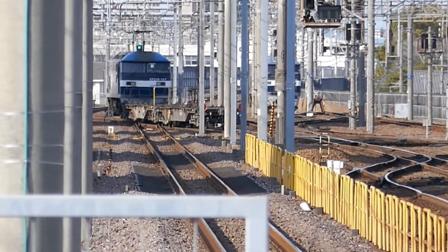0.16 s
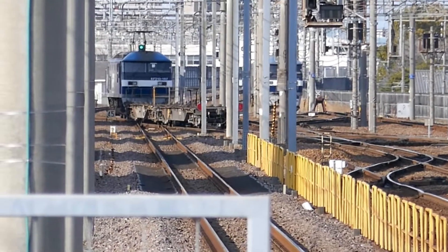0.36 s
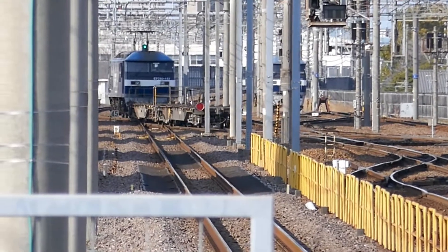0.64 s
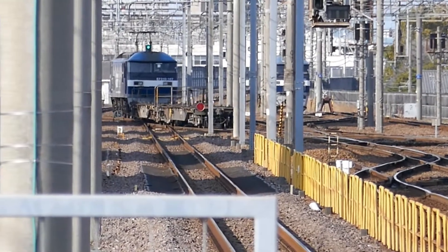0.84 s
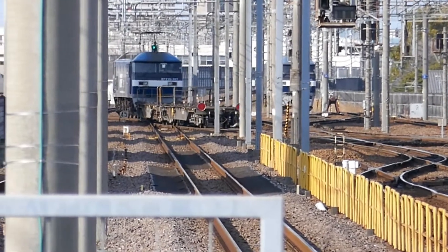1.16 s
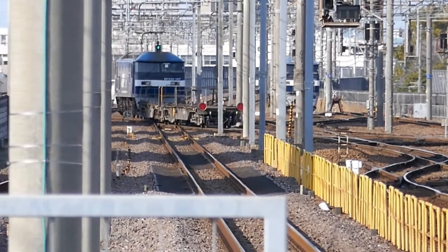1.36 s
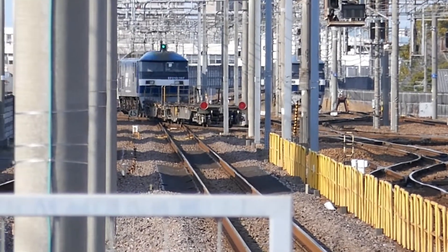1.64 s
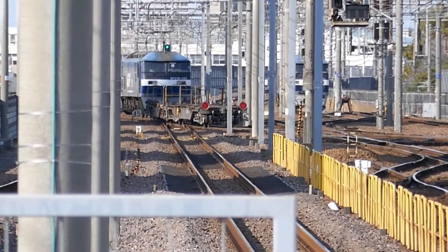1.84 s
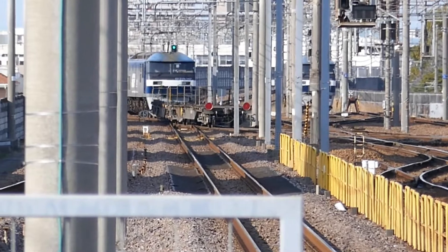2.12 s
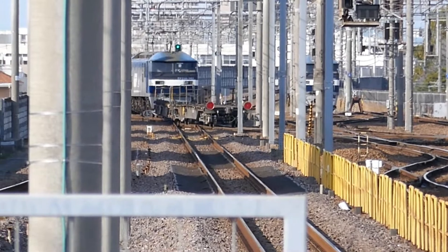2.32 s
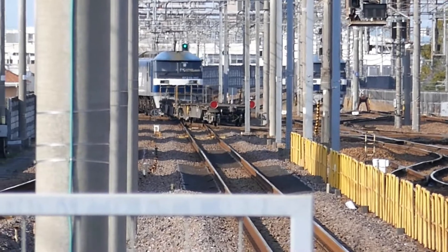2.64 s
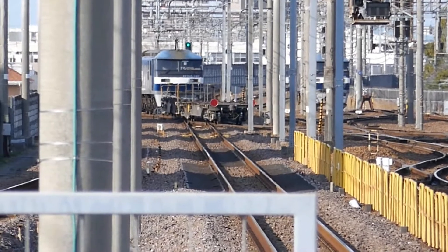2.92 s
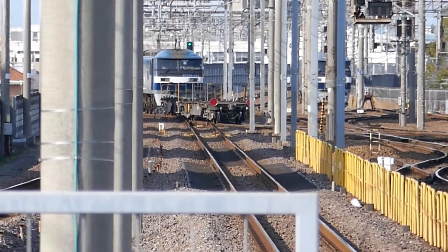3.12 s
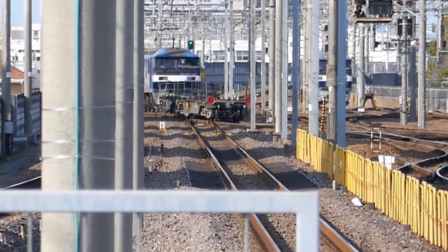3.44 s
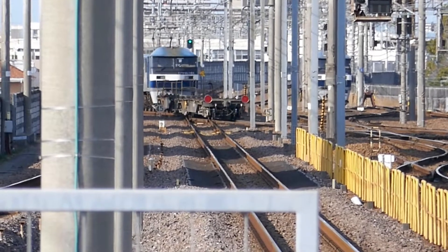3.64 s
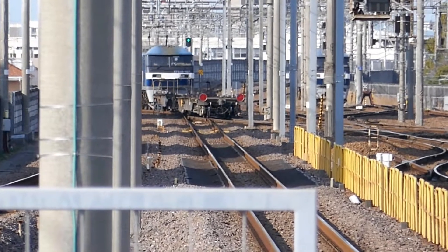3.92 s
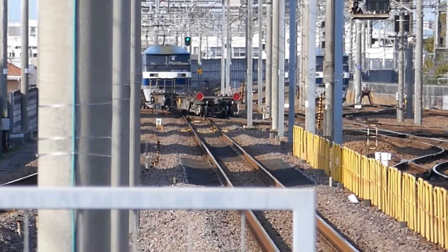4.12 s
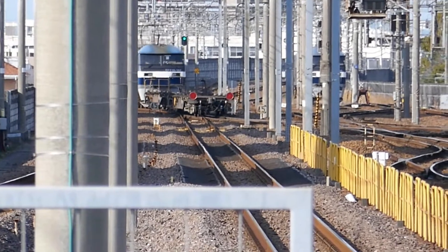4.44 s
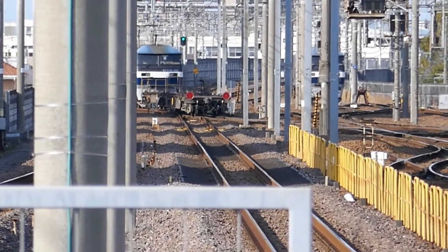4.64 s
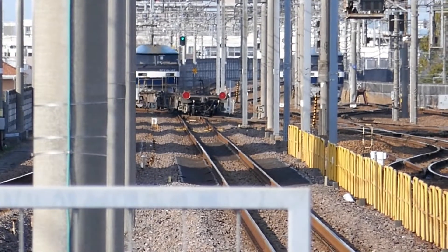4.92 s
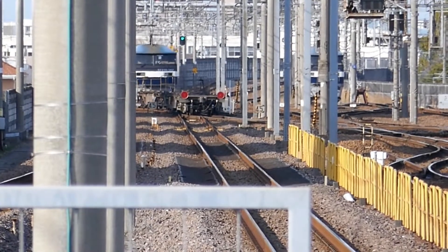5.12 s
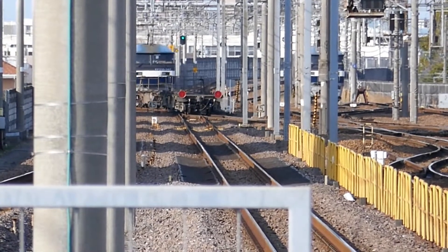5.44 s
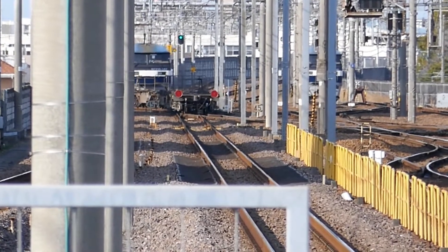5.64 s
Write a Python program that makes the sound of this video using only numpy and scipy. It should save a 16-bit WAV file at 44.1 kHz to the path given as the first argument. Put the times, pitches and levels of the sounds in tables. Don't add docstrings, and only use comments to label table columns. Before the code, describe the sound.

A slow electric freight train in an open rail yard, heard from a platform end through a small stereo camera microphone with soft hiss. It starts fairly quiet: rough wheel roar, mostly low-middle, slightly left, with a motor hum near 100 Hz and its overtones. From 0.5 to 2 s the hum glides up about a third of its pitch, fluttering in short uneven swells, while the roar grows; the deep hum is strongest around 2 s. It sinks back by 3 s, then hovers with smaller swells near 3.5 s and fades. A faint fan winds up beneath, clearest at 2.3-2.8 s, gone by 3.6 s. Faint bright flange brushes pass at 1.5, 2.1, 3.3 and 3.9 s. From 4.35 s bass deepens, the image centres, and dull joint thumps cluster to 4.9 s, then around 5.4 s. A muted knock falls at 4.9 s, a tiny stone tick at 5.1 s. The roar continues to the end, about 5.8 s.

```python
import sys
import numpy as np
from scipy import signal
from scipy.fft import rfft, irfft, next_fast_len
from scipy.io import wavfile
from scipy.ndimage import uniform_filter1d

SR = 44100
rng = np.random.default_rng(int(sys.argv[2]) if len(sys.argv) > 2 else 0)


def decibels_to_gain(level_db):
    exponent = np.asarray(level_db, float) / 20
    return 10 ** exponent


def store_pcm(level_fs):
    pcm = np.round(np.clip(level_fs, -1, 1) * 32767).astype(np.int16)
    wavfile.write(sys.argv[1], SR, np.atleast_2d(pcm).T)


N = 254456
M = next_fast_len(N)
TIME_S = np.arange(N) / SR
LEFT_RIGHT = np.array([[1], [-1]])


def columns(table):
    s, *values = np.transpose(table)
    return [np.interp(TIME_S, s, v) for v in values]


def at(table, hz):
    table_hz, table_db = np.transpose(table)
    return np.interp(np.log(hz), np.log(table_hz), table_db)


def walk(rate_hz):
    hold = int(SR / rate_hz)
    steps = np.repeat(rng.standard_normal(N // hold + 1), hold)
    return 1.323 * uniform_filter1d(uniform_filter1d(steps, hold), hold)[:N]


def ramp(start_s, length_s):
    return np.clip((TIME_S - start_s) / length_s, 0, 1)


def place(x, pan_db):
    return x * decibels_to_gain(np.array([pan_db * np.ones(N), -pan_db * np.ones(N)]) / 2)


def swells(table, floor_db):
    edge_s = 0.06
    gain = decibels_to_gain(floor_db)
    for start_s, length_s, db in table:
        rise = ramp(start_s - edge_s / 4, edge_s)
        fall = 1 - ramp(start_s + length_s - edge_s / 2, edge_s)
        gain = gain + decibels_to_gain(db) * rise * fall
    return 20 * np.log10(gain)


def orders(hz, numbers, levels_db, wobble_hz, rough, lag_rad):
    turns = np.cumsum(hz + wobble_hz * walk(12)) / SR
    out = 0
    for k, db in zip(numbers, levels_db):
        size = np.sqrt(2) * decibels_to_gain(db) * (1 + rough * k * walk(30))
        out = out + size * np.sin(2 * np.pi * k * turns + lag_rad * LEFT_RIGHT)
    return out


def shudder(hz, db, width_hz):
    phase = 2 * np.pi * np.cumsum(hz) / SR
    return decibels_to_gain(db) * (walk(width_hz) * np.sin(phase) + walk(width_hz) * np.cos(phase))


# time in seconds, rotation order in Hz.
MOTOR_SPEED = [(0, 98.2), (.6, 104.8), (.8, 108.5), (1.0, 112), (1.5, 124), (1.8, 131.8), (2.0, 131.8),
               (2.2, 127), (2.5, 114.5), (2.66, 101.5), (3.0, 98.2), (3.2, 95.5), (3.65, 101.8),
               (4.0, 103.4), (4.19, 102), (4.41, 107.8), (5.1, 99.8), (5.77, 100.3)]
# start in seconds, length in seconds, level in dB.
ORDER_1_SWELLS = [(0, 0.123, -49), (.36, 0.16, -44.5), (.6, 0.13, -44), (0.784, 0.29, -39),
                  (1.08, 0.23, -37), (1.302, 0.22, -40.5), (1.502, 0.34, -32.5), (1.862, 0.15, -26),
                  (2.053, 0.11, -25), (2.14, 0.18, -25), (3.6, 0.3, -40.5), (4.074, 0.44, -40),
                  (5.0, 0.46, -42)]
# start in seconds, length in seconds, level in dB.
ORDER_2_SWELLS = [(.37, .2, -35), (.6, 0.14, -28.5), (.76, 0.18, -24), (1.03, 0.23, -27), (1.33, .14, -23),
                  (1.53, 0.18, -24.5), (1.7, .17, -20), (1.97, 0.14, -23), (2.26, .18, -32),
                  (2.751, 0.523, -26.5), (3.29, 0.18, -32), (3.47, 0.15, -21.5), (3.63, .16, -21.5),
                  (3.83, .17, -28), (4.06, 0.19, -36), (4.3, 0.14, -26.5), (4.95, 0.13, -34)]
# start in seconds, length in seconds, level in dB.
ORDER_3_SWELLS = [(.62, 0.24, -34.5), (1.0, 0.31, -34.5), (1.42, 0.095, -34.5), (1.63, 0.11, -28),
                  (1.87, 0.22, -35.5), (3.6, 0.45, -40.5), (4.38, .2, -31.5)]


def motor():
    hz, = columns(MOTOR_SPEED)
    levels_db = [swells(ORDER_1_SWELLS, -55.5), swells(ORDER_2_SWELLS, -44.5), swells(ORDER_3_SWELLS, -51)]
    hum = orders(hz, (1, 2, 3), levels_db, wobble_hz=0.85, rough=0.12, lag_rad=0.16)
    load_db = 10 * np.log10(uniform_filter1d(decibels_to_gain(levels_db[1]) ** 2, size=13000))
    for k, db, width_hz in ((2, -12.5, 43), (3, -20.0, 50), (4, -16.0, 30), (5, -16.5, 36)):
        hum = hum + shudder(k * hz, load_db + db, width_hz)
    return place(0.87, -0.8) * hum


def passage():
    points = ramp(4, 0.72)
    light_wagons = ramp(2.33, 0.22) * (1 - ramp(4.35, 0.15))
    body_db = -2 - 2 * light_wagons - points
    ground_db = -11.5 - 5 * (1 - ramp(0.3, 0.83)) + 0.5 * ramp(2.33, 0.48) + 7 * points
    pan_db = np.interp(TIME_S, (0, 0.83, 2.5, 4.5), (4.5, 7, 7, 0.5))
    return body_db, ground_db, pan_db


# time in seconds, roar in dB, brightness in dB.
ROLL_LEVELS = [(0, -34, -38), (.3, -32, -36), (.7, -30.5, -34.5), (1.0, -28.5, -33.5), (1.3, -26.5, -32),
               (1.55, -28, -29), (1.95, -25, -32), (2.16, -26.5, -30.5), (2.36, -26.5, -32),
               (2.8, -26, -34.5), (3.2, -27.5, -32), (3.42, -26, -33.5), (3.75, -27, -31.5),
               (4.15, -28, -34.5), (4.5, -27.5, -34.5), (4.9, -28.5, -36), (5.3, -27, -35.5),
               (5.77, -27.5, -34)]
# frequency in Hz, density in
# dB per Hz.
ROLL_COLOUR = [(30, -46.5), (55, -14.5), (90, -9), (160, -3.5), (300, 0), (450, -4), (750, -7.5),
               (1080, -4.5), (1500, -10.5), (2000, -14), (2500, -20.5), (2780, -24),
               (2950, -32.5), (3250, -32), (3500, -37.5), (3900, -38.5), (4100, -44.5), (4350, -41),
                 (5000, -48.5), (5600, -54.5), (5870, -62.5), (6080, -53.5), (7000, -58), (8100, -62.5),
                 (8350, -60), (9000, -70.5)]
# frequency in Hz, side minus mid in dB.
STEREO_WIDTH = [(30, -9), (70, -12), (200, -16), (500, -12.5), (1100, -8), (2600, -9), (4500, -6.5),
                (7000, 5.5)]
# frequency in Hz, phase in radians.
PORT_LEAD = [(60, 0), (250, 0.26), (690, 0.33), (1200, 0.18), (1800, -0.11), (3000, -.3), (5000, 0)]


def rolling():
    roar_db, bright_db = columns(ROLL_LEVELS)
    body_db, ground_db, pan_db = passage()
    hz = np.maximum(np.fft.rfftfreq(M, 1 / SR), 1)
    colour = decibels_to_gain(at(ROLL_COLOUR, hz) - 40 * (hz > 9500))
    middle = (hz > 500) & (hz < 2500)
    colour = colour / np.sqrt(2 * np.sum(colour[middle] ** 2) / M)
    mid, side = rfft(rng.standard_normal((2, M))) * colour
    mid = mid * np.exp(0.5j * at(PORT_LEAD, hz) * LEFT_RIGHT)
    out = 0
    for centre_hz in 30 * 2 ** np.arange(0, 8.6, 0.5):
        share = np.cos(np.pi / 2 * np.clip(2 * np.log2(hz / centre_hz), -1, 1)) ** 2
        pair = mid + side * decibels_to_gain(at(STEREO_WIDTH, centre_hz)) * LEFT_RIGHT
        pair = irfft(pair * share, M)[:, :N]
        ground = np.clip(np.log2(260 / centre_hz) / 1.2, 0, 1)
        body = (1 - ground) * np.clip(np.log2(600 / centre_hz) / 0.29, 0, 1)
        treble = np.interp(centre_hz, (900, 2000, 3800, 5400, 7700), (0.17, 0.83, 1.16, 1.7, 1.5))
        db = roar_db + ground * (ground_db + 6) + body * (body_db + 2.5) + treble * (bright_db + 32)
        db = db - 5 * np.interp(centre_hz, (3000, 5000), (0, 1)) * (1 - ramp(1.6, 0.4))
        db = db + 0.36 * walk(2.5) + 0.93 * walk(12)
        shade = np.clip(np.log2(centre_hz / 280) / 2.77, -0.15, 1.1)
        shade = shade * np.interp(centre_hz, (1200, 2500, 5000, 6200), (1.27, 0.19, 0.8, 0.048))
        out = out + decibels_to_gain(db) * place(pair, shade * pan_db)
    return out


# frequency in Hz, density in dB per Hz.
HISS_COLOUR = [(3000, -13.5), (5500, -18.5), (5870, -18.5), (6100, -5.5), (8000, -7), (8350, -8.5),
               (8800, 1.5), (10200, 3), (11000, 0.5), (12500, -1.5), (15000, -11)]


def hiss():
    hz = np.maximum(np.fft.rfftfreq(M, 1 / SR), 1)
    colour = decibels_to_gain(at(HISS_COLOUR, hz) - 40 * (hz < 2500))
    noise = irfft(rfft(rng.standard_normal((3, M))) * colour, M)[:, :N]
    noise = noise[1:] + 0.61 * noise[0]
    air_db = -70.5 + 0.55 * (sum(columns(ROLL_LEVELS)) + 60) - 2.5 * (1 - ramp(1.7, 0.6))
    return noise / noise.std() * decibels_to_gain(air_db + 0.5 * walk(5.4))


def blower():
    hz = 47.6 + 7.2 * TIME_S
    running = ramp(0.1, 0.85) * (1 - ramp(3.42, 0.17))
    throb_db = swells([(2.35, 0.82, -55)], -54)
    louvres = [(2.3, 0.5, -39.5)]
    levels_db = throb_db, swells(louvres, -59), swells(louvres, -56) - 2.5
    fan = orders(hz, (1, 2, 5), levels_db, wobble_hz=0.3, rough=0.1, lag_rad=0.1)
    return place(0.97, -1.0) * running * fan


# centre in seconds, length in seconds, level in dB.
FLANGE_SCRAPES = [
    (1.55, 0.036, -74),
    (2.068, 0.036, -66),
    (3.298, 0.097, -72.5),
    (3.9, .06, -68.5),
]


def scrapes():
    swell = 0
    for centre_s, length_s, db in FLANGE_SCRAPES:
        swell = swell + decibels_to_gain(db) * np.exp(-0.5 * ((TIME_S - centre_s) / length_s) ** 2)
    band = signal.butter(2, (3600, 7500), "bandpass", fs=SR, output="sos")
    noise = signal.sosfilt(band, rng.standard_normal((3, N)))
    return place(swell * (noise[0] + 0.61 * noise[1:]) / noise.std(), 2.0)


def blows(table, cycles, lag_s):
    out = np.zeros((2, N))
    for start_s, db, hz, pan_db in table:
        t = np.arange(int(6 * cycles / hz * SR)) / SR
        shape = t * hz / cycles * np.exp(1 - t * hz / cycles)
        i = int(start_s * SR)
        for side, sign in enumerate((1, -1)):
            ring = decibels_to_gain(db + sign * pan_db / 2) * shape * np.sin(2 * np.pi * hz * (t + sign * lag_s))
            out[side, i:i + len(t)] += ring[:N - i]
    return out


# start in seconds, peak in dB, ring in Hz, left minus right in dB.
JOINT_BLOWS = [(4.359, -22.5, 216.5, 3), (4.406, -20.5, 201.6, -3), (4.428, -14.5, 208.3, 0.5),
               (4.481, -26.5, 315, 0.5), (4.588, -23.5, 132.8, -0.5), (4.697, -17.5, 121, 1.5),
               (4.769, -23.5, 336, 2.5), (4.807, -23, 225, 2), (4.84, -25, 111, -2),
               (4.43, -22, 105.7, -0.5), (4.59, -17.5, 260, 1), (4.87, -19, 202, -0.5),
               (5.259, -25, 221.7, -4), (5.362, -19.5, 205, 1.5), (5.464, -13.5, 236.8, 0),
               (5.509, -23, 155.5, -1.5), (5.699, -25.5, 127.2, -1)]


def thumps():
    return decibels_to_gain(-1) * blows(JOINT_BLOWS, cycles=1.2, lag_s=0.0002)


# start in seconds, peak in dB, ring in Hz, left minus right in dB.
LOOSE_KNOCKS = [
    (4.881, -22.5, 995, -1),
]


def knocks():
    return decibels_to_gain(-8) * blows(LOOSE_KNOCKS, cycles=4.0, lag_s=0.0001)


# start in seconds, peak in dB, ring in Hz, left minus right in dB.
BALLAST_TICKS = [
    (5.09, -54, 4600, -1),
    (5.09, -58, 6200, 3),
]


def ticks():
    return blows(BALLAST_TICKS, cycles=3.0, lag_s=0)


def scene():
    train = motor() + rolling() + blower()
    return train + scrapes() + thumps() + knocks() + ticks()


def top_cut(x):
    return signal.sosfilt(signal.butter(12, 15150, fs=SR, output="sos"), x)


def record(dry):
    opening = ramp(0, 0.004)
    return top_cut(opening * (dry + hiss()))


dry = scene()
out = record(dry)
store_pcm(out)
```